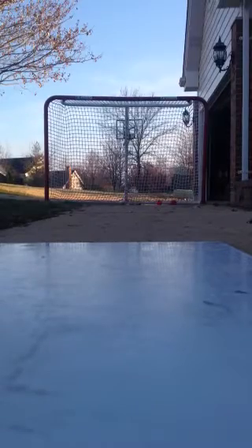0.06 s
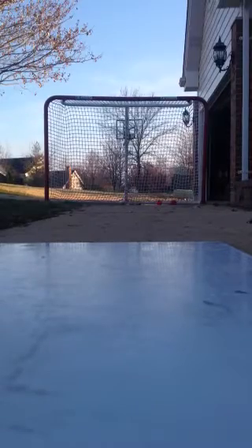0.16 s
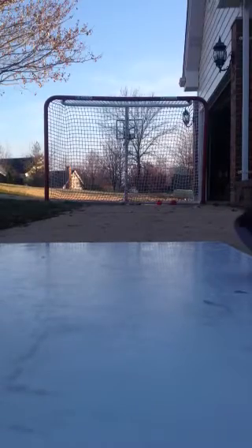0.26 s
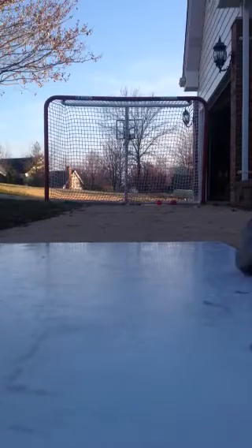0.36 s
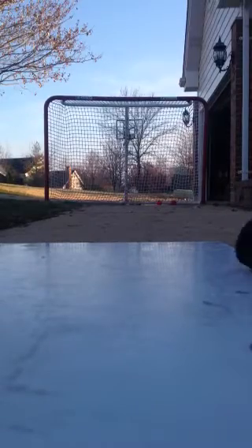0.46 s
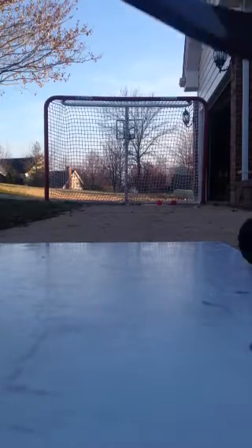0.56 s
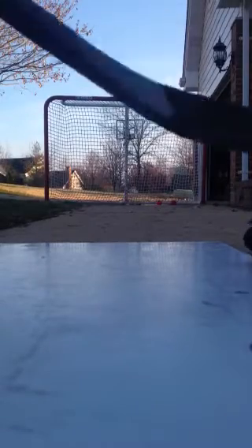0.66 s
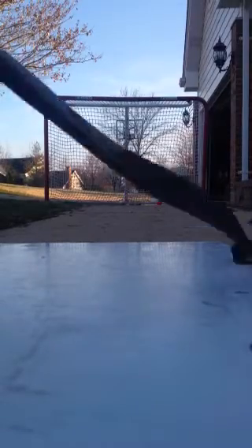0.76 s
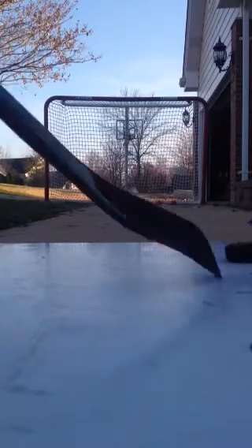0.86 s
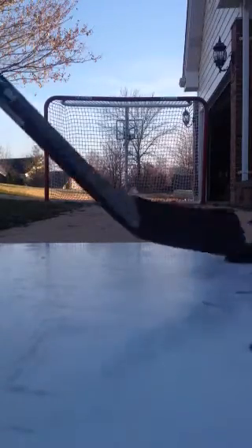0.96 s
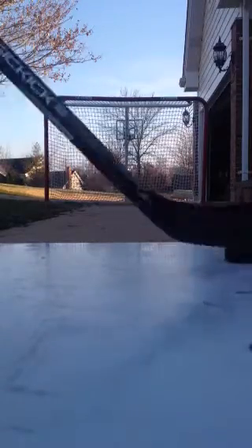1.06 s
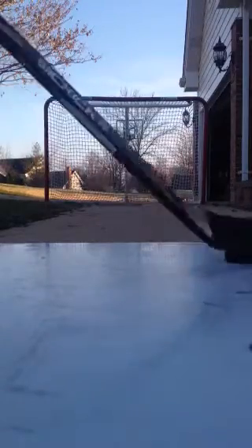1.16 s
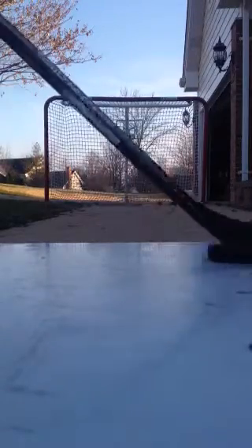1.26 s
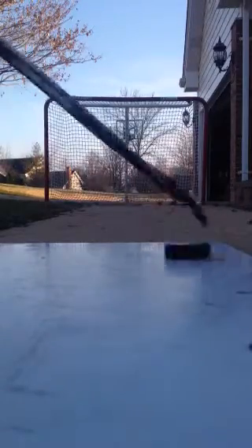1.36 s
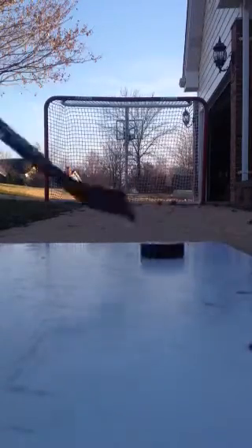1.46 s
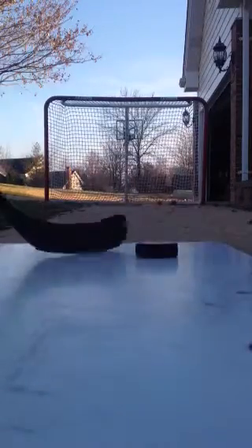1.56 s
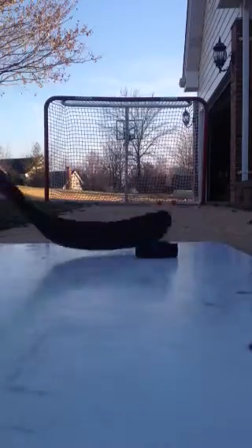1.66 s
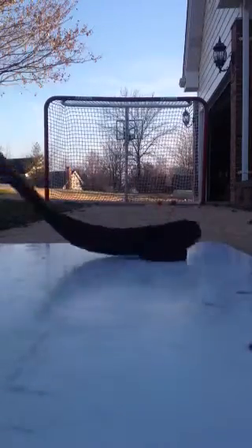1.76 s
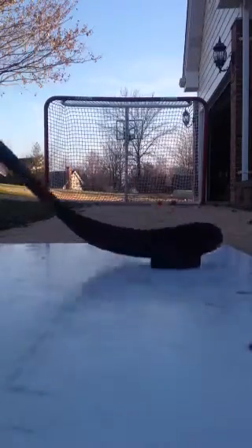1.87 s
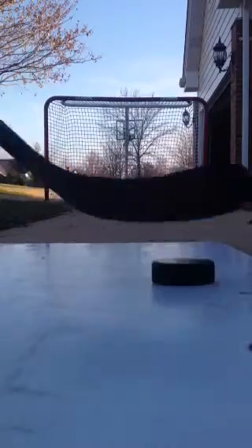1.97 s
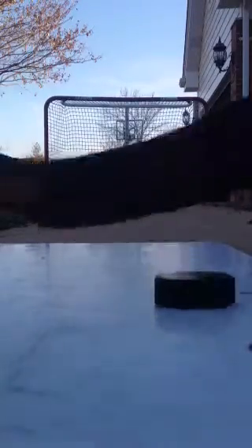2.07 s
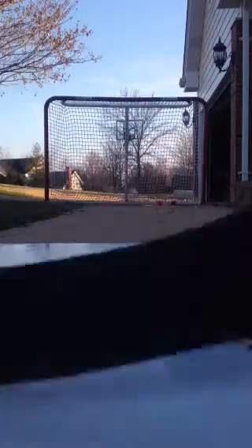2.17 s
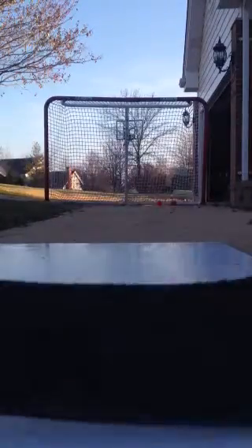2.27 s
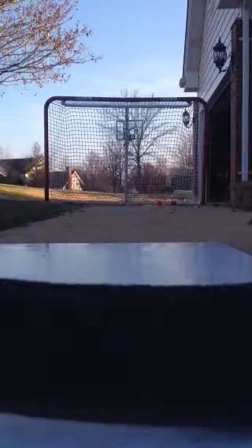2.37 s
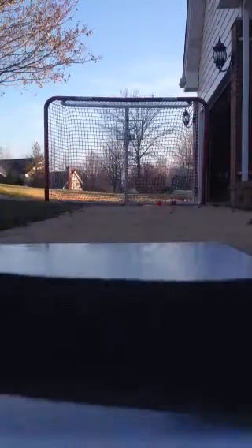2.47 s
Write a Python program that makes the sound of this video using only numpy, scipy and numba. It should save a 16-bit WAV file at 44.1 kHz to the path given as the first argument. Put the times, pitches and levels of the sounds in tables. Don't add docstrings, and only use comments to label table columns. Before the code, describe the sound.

A hockey puck drops with a sharp crack on a plastic pad, then stick taps and scrapes

```python
import sys
import numpy as np
from scipy import signal
from scipy.fft import rfft, irfft
from scipy.io import wavfile
from numba import njit

SR = 44100
rng = np.random.default_rng(int(sys.argv[2]) if len(sys.argv) > 2 else 0)


def wav_record(signal):
    frames = np.transpose(np.atleast_2d(signal))
    bounded = np.clip(frames, -1, 1)
    quanta = np.round(bounded * 32767).astype(np.int16)
    wavfile.write(sys.argv[1], SR, quanta)


def convert_level_to_amplitude(level_db):
    exponent = np.asarray(level_db, float) / 20
    return 10 ** exponent


N = 112455

# (frequency [Hz], width [Hz], level [dB])
BODY_MODES = [(310, 394, -0.5), (667, 321, 4), (987, 424, 1.5), (1522, 230, 2.5), (1756, 370, -1),
              (2282, 280, -4), (3260, 1100, -8.5)]
# (time [s], level [dB])
HUSH_SWELL = [(0, -3.5), (.24, -3.5), (.55, -4.5), (0.66, -10), (.74, -8.5), (1.08, -3), (1.15, -8.5),
              (1.22, -4.5), (2.55, -2.5)]


@njit
def svf(x, hz, width):
    y, b, l = np.empty((2, len(x))), 0., 0.
    g, k = np.tan(np.pi * hz / SR), width / hz
    for i in range(len(x)):
        v = (b + g * (x[i] + 1e-18 - l)) / (1 + g * (g + k))
        y[0, i], y[1, i] = l + g * v, k * v
        b, l = 2 * v - b, l + 2 * g * v
    return y


def low(x, hz):
    return svf(x, 1. * hz, hz * np.sqrt(2))[0]


def high(x, hz):
    return signal.sosfilt(signal.butter(2, hz, "high", fs=SR, output="sos"), x)


def ring(x, table):
    return sum((-1) ** k * convert_level_to_amplitude(db) * svf(x, 1. * f, 1. * w)[1] for k, (f, w, db) in enumerate(table))


def unit(x):
    return x / np.sqrt(np.mean(x ** 2))


def drift(hz):
    return unit(low(rng.standard_normal(N), hz))


def clicks(n, per_s, spread_db):
    u = rng.random((3, n))
    hit = u[0] < per_s / SR
    return unit(hit * np.sign(u[1] - .5) * convert_level_to_amplitude(-spread_db * np.log(1 - u[2])))


def contacts():
    # (time [s], crack level [dB], knock level [dB re crack], chatter time [ms])
    bounces = [(0.2454, -33, -13, 1.7), (0.2485, 0, -22.5, 0.35), (.2501, 4, -15.5, 1.5),
               (.2511, -9.5, -13, 0.61), (.2520, 4.5, -31, 0.6), (.2540, -11.5, -6, 1.2),
               (0.256, -8, -30, 0.72), (0.2636, -7.5, -11, 5.5), (0.2741, -16.5, -3, 37),
               (0.2949, -22, -29, 1.6), (.3160, -22.5, -9.5, 1.3), (0.3535, -34, -1.5, 2.1),
               (0.3585, -10.5, -17, 4.1), (0.378, -42, 11.5, 17), (0.4556, -26, -4, 2.5),
               (0.4708, -44, 9.5, 13), (0.4869, -35.5, -6.5, 3.1), (0.497, -56, 7, 15),
               (0.5678, -46.5, 1, 2.5), (0.581, -58.5, 8, 7.8), (0.718, -63.5, -3.5, 5)]
    rattle = [(0.748, -23.5, -4, 5.5), (0.7874, -35.5, 12.5, 2.2), (0.7894, -9, -15.5, 4.7),
              (0.7944, -24, 2, 9.7), (0.8088, -24.5, -8, 2), (0.8188, -25, -12, 2.5), (0.828, -43, -1, 8.1),
              (0.839, -41.5, 5, 9), (0.8668, -25.5, -4.5, 6.8), (0.8899, -11.5, -8, 2.5),
              (0.9001, -17.5, -8, 2.8), (0.909, -29, -1.5, 6.5), (0.9312, -32, 5.5, 10),
              (0.9391, -18.5, -8.5, 6.3), (0.9525, -15, -6, 4.3), (0.99, -17, -5, 5)]
    taps = [(1.2207, -46, 12.5, 12), (1.2257, -31.5, -6.5, 4), (1.2404, -35.5, 6.5, 3.2),
            (1.2478, -42, 6, 1.3), (1.2575, -29, -5.5, 1.9), (1.3140, -30.5, -2.5, 3),
            (1.3832, -16.5, -11.5, 0.37), (1.3844, -25, 2, 1.85), (1.3860, -32.5, 7.5, 2.5),
            (1.5600, -45, 1, 3.7), (1.5815, -57, 9, 1.9), (1.6019, -4, -7.5, 2.5),
            (1.6070, -20.5, -0.5, 5.4), (1.6117, -7.5, -7, 3.7), (1.6170, -11, -2.5, 4.8),
            (1.6239, -8, -14, 3.3), (1.6330, -13.5, -11.5, 1.5), (1.753, -31, 9.5, 1.3),
            (1.7555, -19, -9, 7.6), (1.7662, -22, -5, 4.8), (1.835, -36.5, 7.5, 3.6), (1.875, -38, 1, 3.7),
            (1.897, -46, 10, 5.6), (1.9742, -17, -7, 5.5), (1.981, -21, -10.5, 3),
            (1.9855, -16.5, -9.5, 6.8), (2.1634, -26, -7.5, 1.2), (2.2373, -8, -1, 0.75),
            (2.2389, -17.5, 4.5, 2.5), (2.2454, -4.5, -20, 1.5), (2.2485, -12.5, -3, 6.1),
            (2.2581, -18.5, -2, 5.5), (2.2734, -15, -15, 3), (2.287, -27.5, -9, 0.8),
            (2.3689, -42, 10, 0.57)]
    # (frequency [Hz], width [Hz], level [dB])
    PUCK_MODES = [(1470, 540, -1.5), (2200, 600, 2.5)]
    RATTLE_MODES = [(353, 34, -9), (842, 200, -0.5), (1120, 92, 2.5), (1428, 97, 0.5), (1902, 67, 2.5),
                    (2130, 90, 4), (2583, 196, 0), (3616, 144, 1.5)]
    TAP_MODES = [(814, 38, 3.9), (919, 48, 8.5), (1424, 107, 7.1), (2055, 69, 2.1), (2250, 140, 4.6)]
    HARD_MODES = [(850, 290, 1.5), (1135, 300, 7), (1473, 320, 8), (1876, 210, 5.5), (2495, 236, -1),
                  (3350, 570, 1.5)]
    DRAG_MODES = [(782, 77, 5), (994, 120, 7), (1233, 160, -1.5), (1535, 110, -6), (1760, 110, -0.5),
                  (2300, 310, -3)]
    BLOW_MODES = [(804, 67, 7.2), (880, 83, 6), (998, 48, 5.7), (1016, 70, 8.9), (1347, 107, 5.8),
                  (1573, 33, 3.3), (1966, 54, 2.3), (2208, 88, 5.1), (2450, 380, 0.69)]
    # (start [s], modes, broad body level [dB], bass cut [Hz])
    stages = [
        (0, PUCK_MODES, 0, 804),
        (.74, RATTLE_MODES, 0.5, 911),
        (1.2, TAP_MODES, -2.5, 650),
        (1.59, HARD_MODES, 1, 750),
        (1.7, DRAG_MODES, 0, 593),
        (2.2, BLOW_MODES, -0.5, 606),
    ]
    rise_ms = 0.61
    ms_in = np.arange(2048) / SR * 1000
    crack, knock = np.zeros(N), np.zeros((len(stages), N))
    for s, db, knock_db, ms in bounces + rattle + taps:
        decay = np.exp(-ms_in / max(ms, .3))
        burst = clicks(len(ms_in), 4000, 2.5) * decay
        push = clicks(len(ms_in), 4000, 2.5) * decay
        burst[0] = 5.5
        push[int(rise_ms * SR / 1000)] = 4.55
        push *= 1 - np.exp(-ms_in / rise_ms)
        i = int(s * SR)
        stage = sum(s >= row[0] for row in stages) - 1
        crack[i:i + len(ms_in)] += burst * convert_level_to_amplitude(db) / np.sqrt(np.sum(burst ** 2))
        knock[stage, i:i + len(ms_in)] += push * convert_level_to_amplitude(db + knock_db) / np.sqrt(np.sum(push ** 2))
    bright = convert_level_to_amplitude(5.5) * low(high(crack, 3900), 9000)
    edge_ring = svf(bright, 6110., 2210.)[1]
    out = bright + convert_level_to_amplitude(-5.5) * edge_ring
    for x, (_, modes, body_db, bass_hz) in zip(knock, stages):
        x = signal.lfilter(*signal.butter(1, bass_hz, "high", fs=SR), x)
        out = out + convert_level_to_amplitude(22.5) * (convert_level_to_amplitude(body_db) * ring(x, BODY_MODES) + ring(x, modes))
    return out


def thuds():
    # (time [s], level [dB], push time [ms])
    landings = [
        (0.2526, -24, 5.6),
        (0.721, -56, 2.1),
        (1.604, -17.5, 0.49),
        (1.7552, -17, 1.34),
        (2.2383, -13, 1.09),
    ]
    # (time [s], level [dB], push time [ms])
    lifts = [(2.3690, -21, 1.9)]
    # (frequency [Hz], width [Hz], level [dB])
    pad_modes = [(178, 140, 18.5), (216.8, 16, 7.5), (413, 59, -6.5)]
    out = np.zeros(N)
    for way, rows in ((1, landings), (-1, lifts)):
        for s, db, ms in rows:
            u = (np.arange(N) / SR - s) * 1000 / ms * 2 * np.pi
            out += way * convert_level_to_amplitude(db) * u * np.exp(.5 - np.clip(u, -9, 9) ** 2 / 2)
    out = high(out, 85)
    return out + convert_level_to_amplitude(-18) * ring(out, pad_modes)


def grit_band(band):
    grit = clicks(N, 20000, 1.5)
    return ring(grit, [band]) * convert_level_to_amplitude(3 * drift(46))


def scrape():
    # (time [s], hiss level [dB], rumble level [dB re hiss])
    slide_in = [(.74, -95.5, -6.5), (.76, -83, -4), (.83, -61, 8.5), (.92, -67.5, 15.5),
                (0.992, -61.5, 14.5), (1.041, -67.5, 3), (1.101, -92.5, 1)]
    slide_out = [(1.217, -92.5, -10), (1.227, -64.5, 17.5), (1.27, -50, -2), (1.34, -39, -19.5),
                 (1.375, -47.5, -7.5), (1.409, -38.5, -18.5), (1.503, -48, -9.5), (1.59, -70, 1.5),
                 (1.739, -70, -1)]
    slide_back = [(1.752, -66, -37), (1.778, -38, -13), (1.858, -37, -35), (1.93, -34.5, -25),
                  (1.964, -36.5, -27), (2.06, -31.5, -26.5), (2.152, -34.5, -28), (2.231, -39, -10),
                  (2.328, -41.5, -10.5)]
    slide_on = [(2.33, -38, -45), (2.378, -46.5, 1.5), (2.438, -65, -17), (2.48, -47.5, -28),
                (2.506, -40, -18.5), (2.55, -42, -21.5)]
    # (frequency [Hz], width [Hz], level [dB])
    hiss_bands = [(3030, 3700, 1), (4900, 630, -15.5), (5430, 680, -9), (6860, 2800, 1), (8840, 1230, 5.5),
                  (11570, 10500, 2.5), (14300, 2000, 7)]
    t = np.arange(N) / SR
    at, hiss_db, rumble_db = np.array(slide_in + slide_out + slide_back + slide_on).T
    shared_catch = convert_level_to_amplitude(1 * drift(174.2))
    hiss = unit(sum(grit_band(band) for band in hiss_bands) * shared_catch)
    rumble = unit(sum(grit_band(band) for band in BODY_MODES))
    rumble = rumble * convert_level_to_amplitude(np.interp(t, at, rumble_db) + 9.5)
    return convert_level_to_amplitude(np.interp(t, at, hiss_db, left=-120) - 8) * (hiss + rumble)


def squeaks():
    # (time [s], length [ms], slip frequency [Hz], level [dB])
    slips = [(1.913, 3.7, 3140, -70), (1.931, 4.4, 2786, -46.5), (1.939, 3.3, 2830, -49.5),
             (1.944, 2.5, 2880, -58), (2.029, 8.5, 3200, -52.5), (2.045, 2.2, 3080, -52),
             (2.060, 3.5, 3090, -46.5), (2.074, 2.2, 2970, -57.5), (2.081, 1.3, 3140, -49),
             (2.09, 2, 2800, -64), (2.169, 19, 2790, -57), (2.195, 13, 2130, -45.5),
             (2.211, 7.5, 1244, -47.5)]
    t, out = np.arange(N) / SR, np.zeros(N)
    turn = 2 * np.pi * np.cumsum(1 + 0.0174 * drift(315)) / SR
    rough = convert_level_to_amplitude(4.7 * drift(510))
    for s, ms, hz, db in slips:
        swell = convert_level_to_amplitude(db) * np.exp(-((t - s) * 1000 / ms) ** 2)
        octave = (hz > 2500) * convert_level_to_amplitude(4) * np.sin(2 * hz * turn)
        out += swell * (np.sin(hz * turn) + octave)
    return out * rough


def wall_tail(t60):
    t = np.arange(SR // 2) / SR
    late = convert_level_to_amplitude(-8.5) * np.exp(-np.log(1000) * t / 0.25)
    echoes = clicks(len(t), 7000, 2.5) * (t > 0.0028)
    return echoes * (convert_level_to_amplitude(-60 * t / t60) + late) / np.sqrt(t60 * SR / 14)


def walls(x):
    x = high(x, 330)
    dull = low(x, 1180)
    bright_echo = convert_level_to_amplitude(-20) * signal.fftconvolve(x - dull, wall_tail(0.13))[:N]
    dull_echo = convert_level_to_amplitude(-7) * signal.fftconvolve(dull, wall_tail(0.083))[:N]
    return bright_echo + dull_echo


def hush_db():
    return np.interp(np.arange(N) / SR, *np.array(HUSH_SWELL).T)


def air():
    # (frequency [Hz], density [dB per Hz])
    spectrum = [(45, -20.5), (150, 4), (300, -5.5), (800, -11), (2000, -17), (4000, -25.5), (9000, -34),
                (15000, -6)]
    f = np.arange(N // 2 + 1) * SR / N + 1
    hz, db = np.array(spectrum).T
    colour = convert_level_to_amplitude(np.interp(np.log(f), np.log(hz), db))
    hush = irfft(rfft(rng.standard_normal(N)) * colour, N)
    return unit(hush) * convert_level_to_amplitude(-56 + hush_db() + 1 * drift(3.6))


def scene():
    near = contacts() + thuds()
    rub = scrape() + squeaks()
    echoes = walls(near + convert_level_to_amplitude(-9) * rub)
    return (near + rub + echoes + air())[None]


def low_pass(x):
    return signal.sosfilt(signal.butter(12, 15990, fs=SR, output="sos"), x)


def record(dry):
    port_hz, port_width_hz, port_db = 6033., 1126., 14
    ceiling = .75
    x = dry[0] + convert_level_to_amplitude(port_db) * svf(dry[0], port_hz, port_width_hz)[1]
    self_noise = convert_level_to_amplitude(-76 + hush_db()) * rng.standard_normal(N)
    x = high(low(x, 6600) + self_noise, 130)
    x = ceiling * np.tanh(x / ceiling)
    x = signal.sosfilt(signal.ellip(6, .5, 40, 15300, fs=SR, output="sos"), x)
    return low_pass(x[None])


dry = scene()
out = record(dry)
wav_record(out)
```